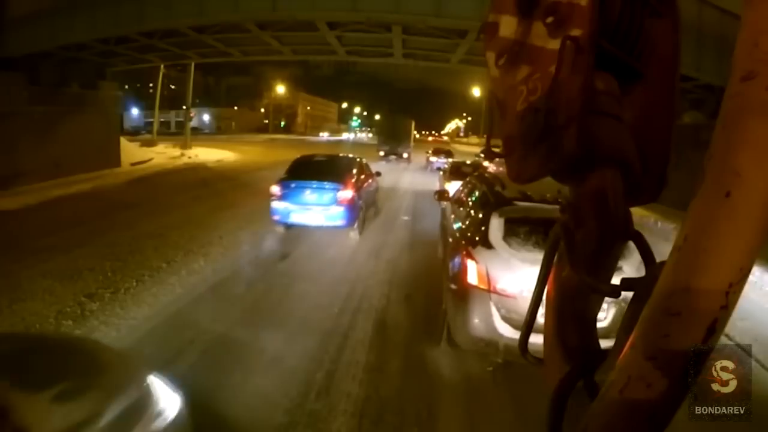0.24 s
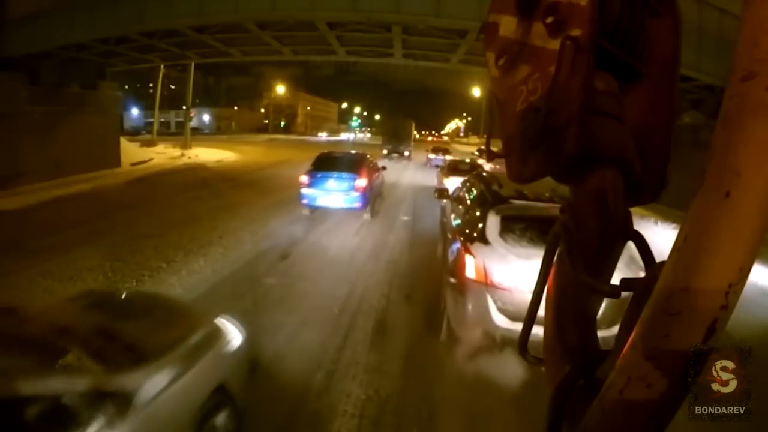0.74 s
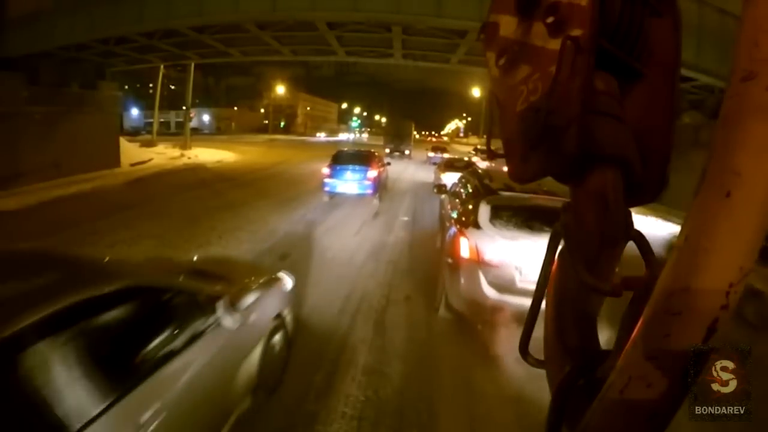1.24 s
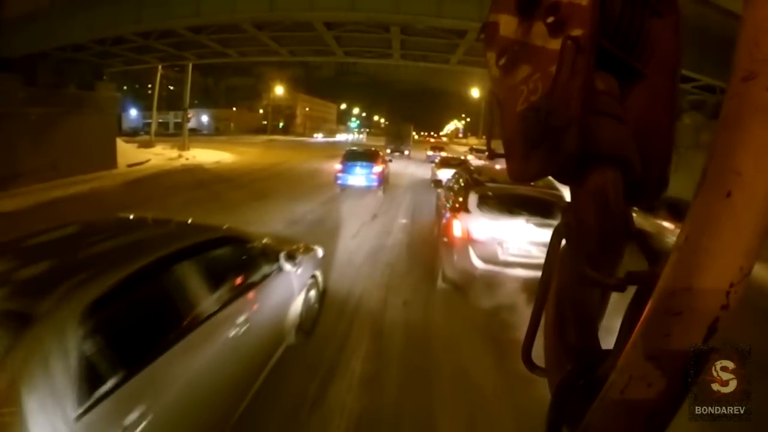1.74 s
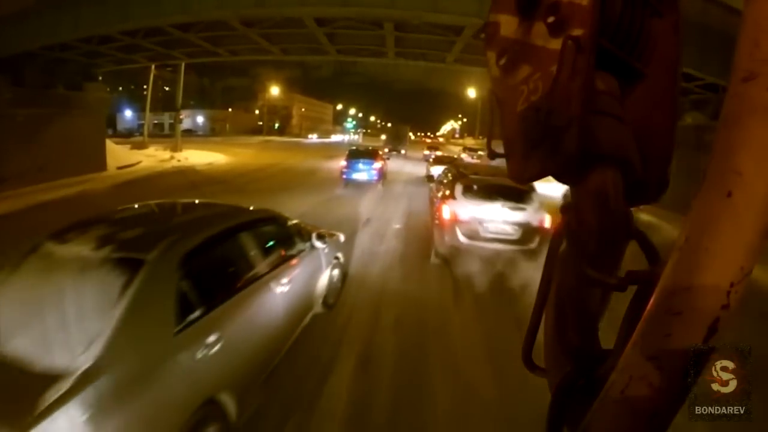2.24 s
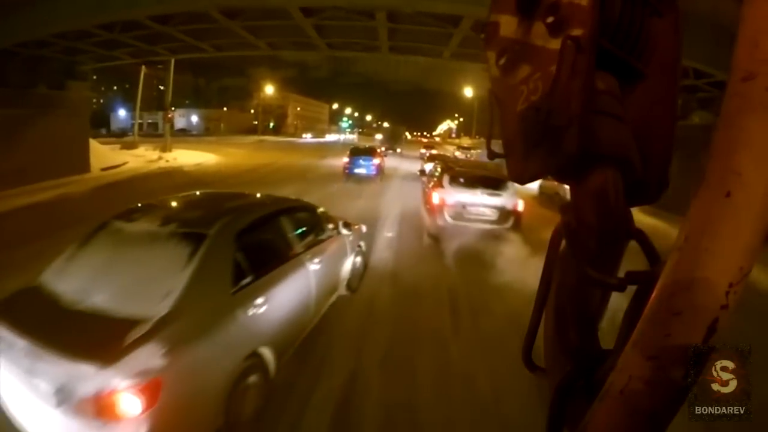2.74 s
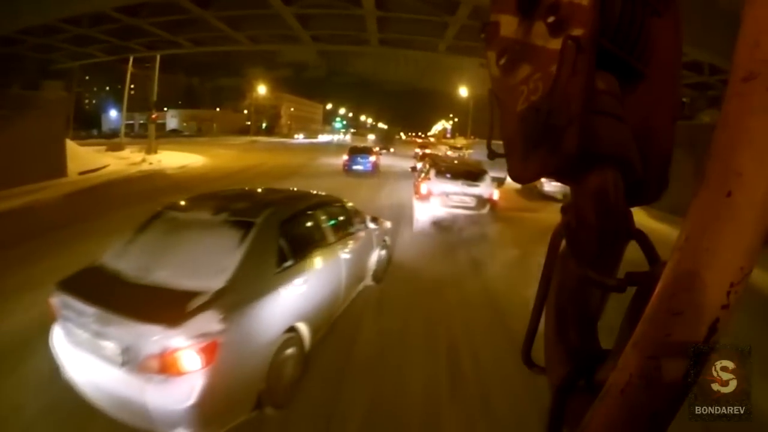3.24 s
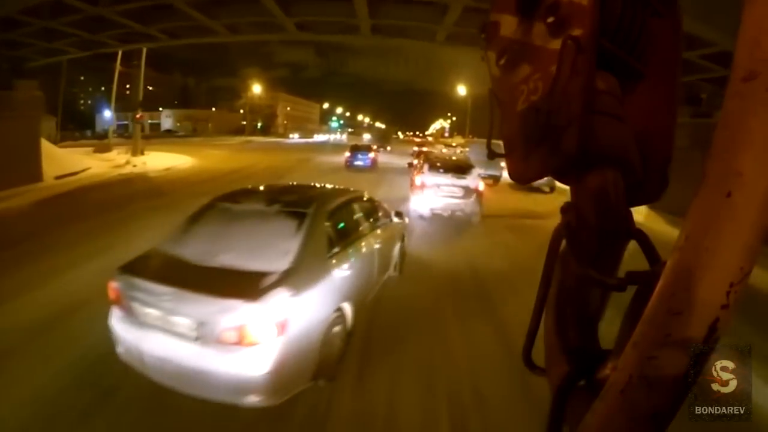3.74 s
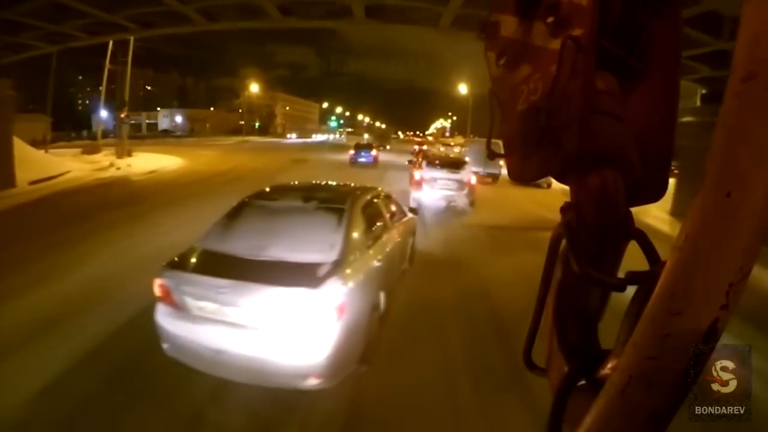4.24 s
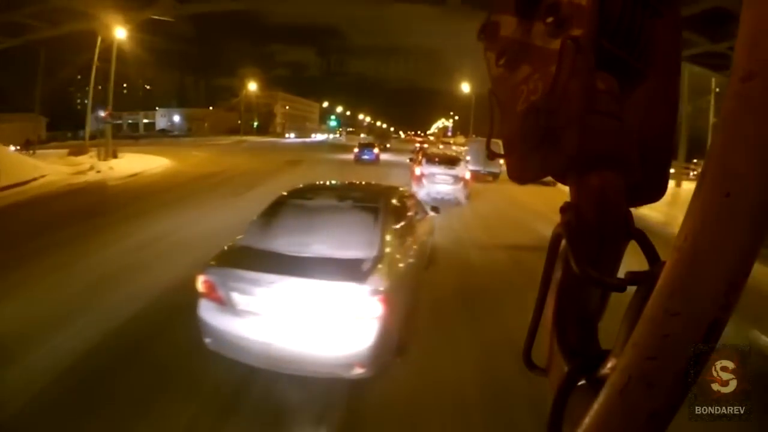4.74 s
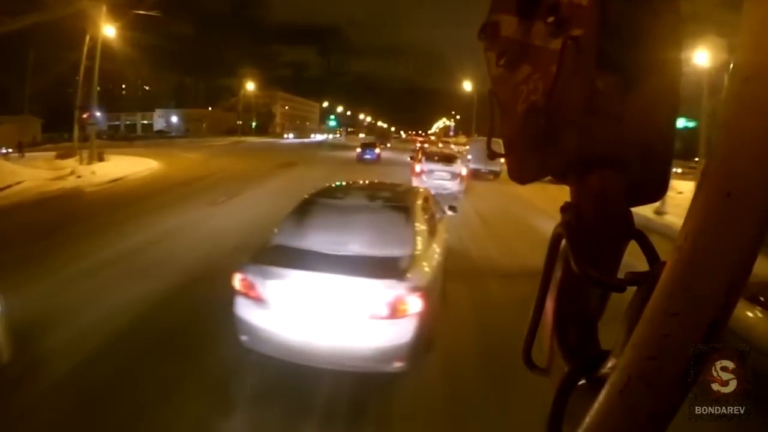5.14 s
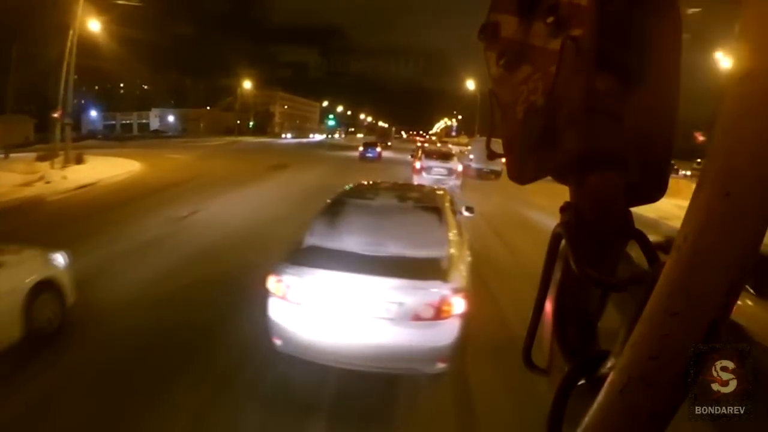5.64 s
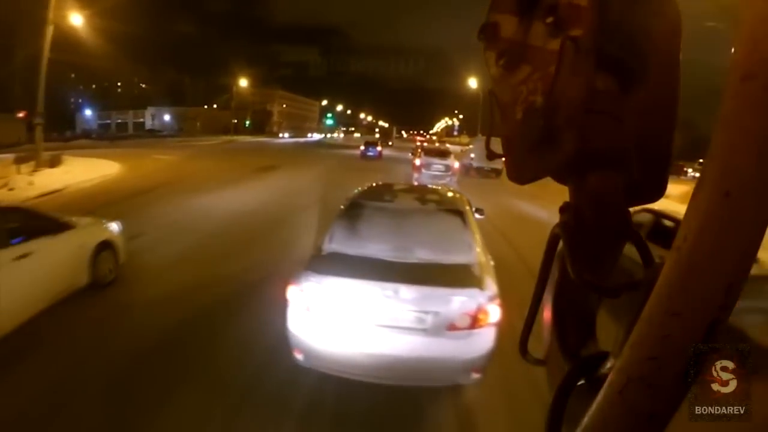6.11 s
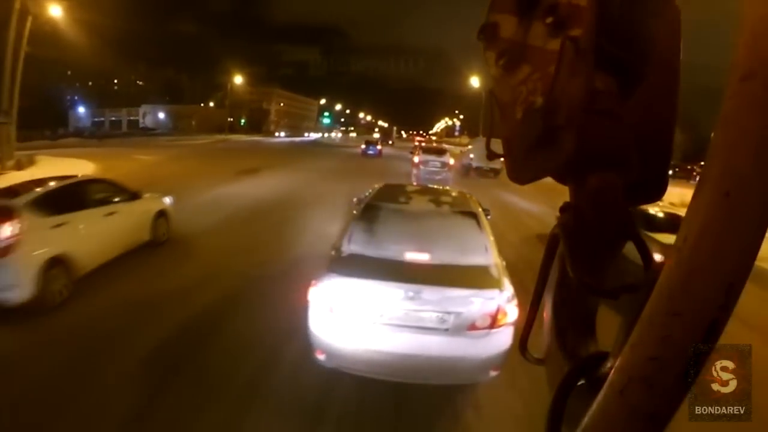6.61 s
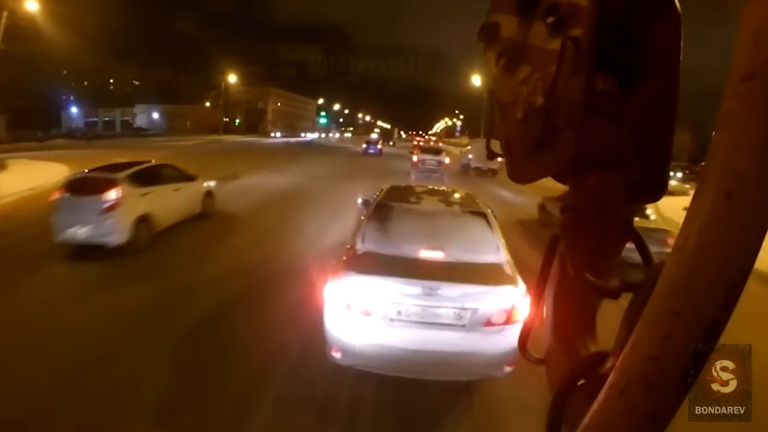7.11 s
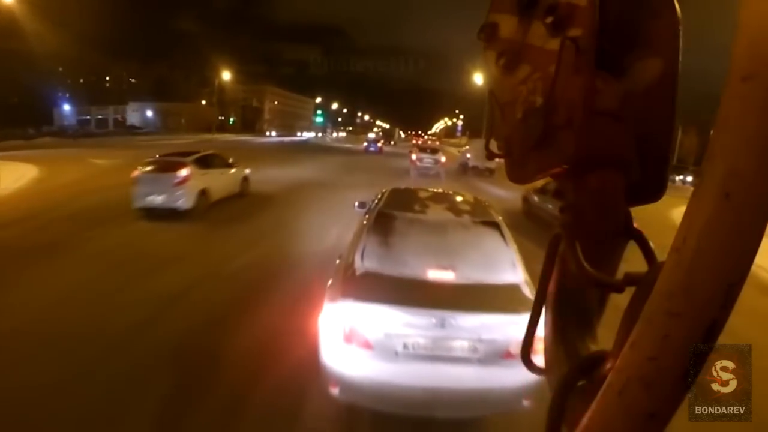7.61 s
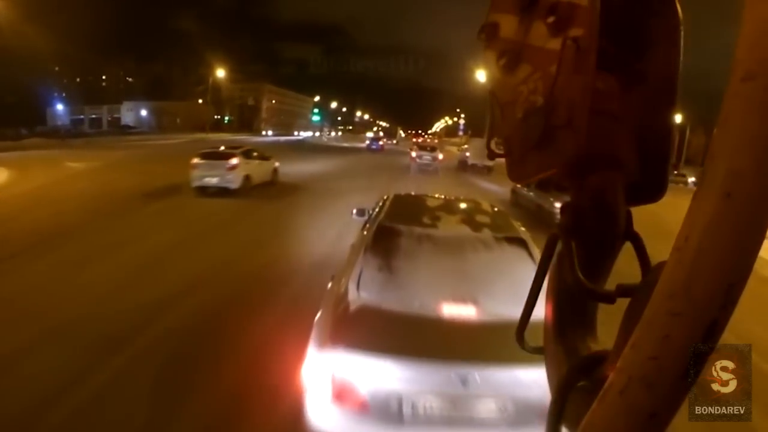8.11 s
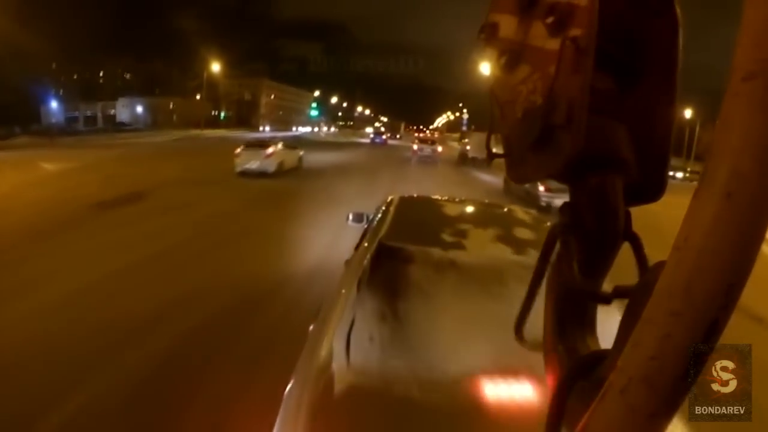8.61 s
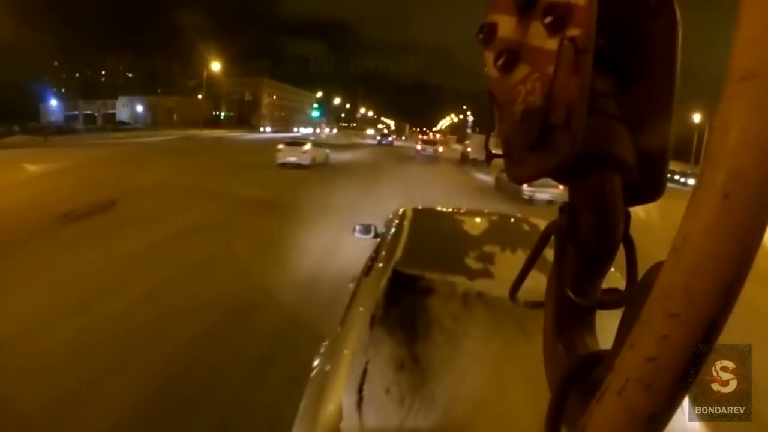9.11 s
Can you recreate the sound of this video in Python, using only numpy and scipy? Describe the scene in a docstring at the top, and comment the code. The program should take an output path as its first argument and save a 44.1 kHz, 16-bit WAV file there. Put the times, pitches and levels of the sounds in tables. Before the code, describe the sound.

Low cab rumble and rough diesel knocking swell as the truck pulls away, then sink back before a thudding bump and loose rattles.

```python
"""Diesel truck in slow traffic

Heard from the cab, a four-cylinder diesel revs up, pulls away and eases off.
Its firings are sine lines that drone and noise bursts that knock and clatter through resonant panels.
Low noise shakes the chassis and a wavering tone booms in the cab, over fan air and a thin whine.
A car hums past early on; near the end noise bursts make a heavy jolt and rattling fittings."""
import sys
import numpy as np
from scipy import signal
from scipy.fft import rfft, irfft
from scipy.io import wavfile

SR = 44100
rng = np.random.default_rng(int(sys.argv[2]) if len(sys.argv) > 2 else 0)


def output_pcm(signal):
    """Save a mono or channel-first signal as 16-bit PCM at the path in sys.argv[1].

    Samples are clipped to [-1, 1] before scaling.
    """
    pcm = np.clip(np.atleast_2d(signal).T, -1, 1) * 32767
    wavfile.write(sys.argv[1], SR, np.round(pcm).astype(np.int16))


N = 412776
TIME = np.arange(N) / SR  # seconds
FREQ = np.fft.rfftfreq(N, 1 / SR)  # Hz


def undb(db):
    """Turn decibels into a gain."""
    return 10 ** (np.asarray(db) / 20)


def unit(x):
    """Scale a signal to a standard level: rms 1."""
    return x / np.std(x)


def noise():
    """White noise: an independent random value at every sample."""
    return rng.standard_normal(N)


def tone(cycles):
    """A sine wave from its running count of cycles."""
    return np.sin(2 * np.pi * cycles)


def curves(table):
    """Join the points of each column of a timed table by straight lines."""
    seconds, *columns = np.transpose(table)
    return [np.interp(TIME, seconds, column) for column in columns]


def walk(rate):
    """Smooth random wandering of rms 1 that changes about rate times a second."""
    slow_part = np.exp(-(FREQ / rate) ** 2) * (FREQ > 0)
    return unit(irfft(rfft(noise()) * slow_part, N))


def colour(points):
    """Noise of rms 1 whose spectrum follows (Hz, dB) points and falls away above them."""
    hz, db = np.transpose(points)
    gain = undb(np.interp(np.log(FREQ + 1), np.log(hz), db))
    gain = gain / (1 + (FREQ / hz[-1] / 2) ** 4)
    return unit(irfft(rfft(noise()) * gain, N))


def ring(x, modes):
    """Let a signal excite steep-sided resonances, which ring only after they are struck; rms 1."""
    power = 0
    for hz, width, db in modes:
        detuning = (FREQ ** 2 - hz ** 2) / (width * (FREQ + 1))
        power = power + undb(db) ** 2 / (1 + detuning ** 2) ** 2
    # Keeping only the first half of the cepstrum makes the filter causal: no sound before the blow
    cepstrum = irfft(np.log(power + 1e-10), N)
    response = np.exp(rfft(cepstrum[:N // 2], N))
    return unit(irfft(rfft(x) * response, N))


def turns(hz):
    """Count the cycles since the start."""
    return np.cumsum(hz) / SR


def swells(rows, attack_s, release_s):
    """Add up gains that each rise, hold and die away, from rows of start, held time and dB."""
    total = 0
    for start, held, db in rows:
        rise = np.clip((TIME - start) / attack_s, 0, 1)
        fall = np.exp(-np.clip((TIME - start - held) / release_s, 0, 20))
        total = total + undb(db) * rise * fall
    return total


def blows(times, levels_db, decay_s, modes):
    """Short bursts of contact noise, quick to build and slower to die, set a group of modes ringing."""
    force = np.zeros(N)
    rise_s = .0015
    for seconds, db in zip(times, levels_db):
        start = int(seconds * SR)
        age = TIME[:N - start]
        rise = np.minimum(age / rise_s, 1)
        force[start:] += undb(db) * rise * np.exp(-np.minimum(age / decay_s, 20))
    force_rms = np.sqrt(np.mean(force ** 2))
    return force_rms * ring(force * noise(), modes)


def bursts(cycle, decay, scatter_db, steady):
    """Noise flares once a cycle with random strength and dies by decay (in cycles) to a steady floor."""
    strength = undb(scatter_db * rng.standard_normal(N // 100))[cycle.astype(int)]
    flare = strength * np.exp(-(cycle % 1) / decay)
    return noise() * (abs(steady) + flare)


# Hum of the passing car. Each row: start in seconds, held time in seconds, level in dB.
CAR_PASSES = [(1.35, 0.81, -27.5)]
CAR_HZ, CAR_SAG_HZ_PER_S = 55.5, 10.3


def passing_car(rough, attack_s, release_s):
    """A low exhaust hum with wavering strength sinks in pitch as a car draws past."""
    hz = CAR_HZ - CAR_SAG_HZ_PER_S * (TIME - CAR_PASSES[0][0])
    hum = (1 + rough * walk(12)) * tone(turns(hz))
    return swells(CAR_PASSES, attack_s, release_s) * hum


# Strength of the cylinders in firing order. One value for each: relative level in dB.
CYLINDER_STRENGTHS = [1, -9, 1.5, -10]


def firings(cycle, scatter_db):
    """Each firing gives a short push; the four cylinders differ, with some chance from push to push."""
    count = cycle.astype(int)
    strength_db = np.array(CYLINDER_STRENGTHS)[count % len(CYLINDER_STRENGTHS)]
    strength_db = strength_db + scatter_db * rng.standard_normal(count[-1] + 1)[count]
    push = np.exp(-((cycle % 1 - .5) / 0.028) ** 2)
    return unit(undb(strength_db) * push)


# Tone of the chassis shake. Each row: frequency in Hz, relative level in dB.
SHAKE_SPECTRUM = [(5, -17.5), (12, -11.5), (24, 5), (34, -7.5), (50, 7), (70, -8.5), (80, -17.5),
                  (92, -4.5), (110, -9.5), (160, -48.5)]
# How strongly the chassis shakes. Each row: time in seconds, level in dB before shake_db is added.
SHAKE_LEVELS = [(0.0, -35.5), (2.19, -44.5), (2.61, -34), (3.05, -40), (4.35, -34), (4.8, -29), (4.95, -37),
                (6.67, -42.5), (7.32, -33), (7.35, -28.5), (8.26, -45), (8.58, -26), (9.36, -35.5)]
# Road rumble in the panels, following the truck's pace.
# Each row: time in seconds, level in dB before rumble_db is added.
ROAD_LEVELS = [(0, -56), (.8, -56), (1.1, -50.5), (3.4, -49.5), (4, -46), (5.8, -39), (7, -45),
               (7.55, -45.5), (8.4, -54), (9.36, -56.5)]
# Low panel resonances, also used by the jolt. Each row: frequency in Hz, width in Hz, relative level in dB.
RUMBLE_RESONANCES = [(91.8, 19, 9), (147, 23.6, 2.5), (208.2, 28, 1.5), (262, 45.7, 6), (323, 67, -2.5),
                     (346, 25.4, -6), (447, 62, -12.5)]
# Booms of the cab over bumps in the road. Each row: start in seconds, held time in seconds, level in dB.
BUMP_BOOMS = [(.02, 0.074, -23.5), (.48, 0.11, -24), (.9, .1, -22.5), (1.52, .12, -25), (2.44, 0.18, -19.5),
              (2.72, 0.49, -21.5), (3.73, 0.33, -18), (4.4, .14, -23.5), (4.9, .07, -18),
              (5.04, 0.098, -18.5), (5.24, 0.34, -20.5), (5.72, 0.29, -19), (6.13, 0.32, -22.5),
              (6.58, .9, -20), (7.6, .28, -20.5), (8.47, .08, -17.5), (8.61, 0.15, -13)]
BOOM_HZ, BOOM_WANDER_HZ = 64.1, 2.08
BOOM_ATTACK_S, BOOM_RELEASE_S = 0.046, 0.051
# The weaker boom between bumps, growing steadily from start to end
SWAY_START_DB, SWAY_DB_PER_S, SWAY_SCATTER_DB = -36, 0.86, 5.5


def cab(cycle, shake_db, rumble_db, uneven_db):
    """Road and firings shake chassis and panels; the lowest cab resonance booms at bumps and sways between."""
    shake, = curves(SHAKE_LEVELS)
    rumble, = curves(ROAD_LEVELS)
    sway = undb(SWAY_START_DB + SWAY_DB_PER_S * TIME + SWAY_SCATTER_DB * np.tanh(walk(11)))
    boom = np.hypot(sway, swells(BUMP_BOOMS, BOOM_ATTACK_S, BOOM_RELEASE_S))
    boom_hz = BOOM_HZ + BOOM_WANDER_HZ * walk(14.7)
    swing = undb(uneven_db * np.tanh(walk(33))) * tone(turns(boom_hz))
    road_share = .6
    panels = road_share * ring(noise(), RUMBLE_RESONANCES)
    panels = panels + (1 - road_share) * ring(firings(cycle, scatter_db=4.0), RUMBLE_RESONANCES)
    chassis = undb(shake + shake_db) * colour(SHAKE_SPECTRUM)
    return boom * unit(swing) + chassis + undb(rumble + rumble_db) * unit(panels)


# Suspension thuds of the jolt. Each row: start in seconds, level in dB before thud_db is added.
SUSPENSION_THUDS = [(8.425, -37), (8.469, -29), (8.516, -25), (8.549, -26.5), (8.64, -29), (8.698, -35),
                    (8.785, -26.5), (8.831, -29.5)]
# Body resonances set off by the thuds. Each row: frequency in Hz, width in Hz, relative level in dB.
THUD_RESONANCES = [(124, 37, 4.5), (168, 49, 3), (260, 74, 2.5), (340, 71, -10.5)]
# The body's shudder through the jolt. Each row: start in seconds, held time in seconds, level in dB.
BODY_SHUDDER = [(8.45, 0.3, -37.5)]
# Panel resonances that knocks excite, also used by the rattles and the diesel.
# Each row: frequency in Hz, width in Hz, relative level in dB.
KNOCK_RESONANCES = [(529.2, 26.6, 1.8), (602, 64, -14.5), (734, 500, -31), (921, 71.3, -2.5),
                    (1071, 126, -15)]
# Clack of the mounts, also used by the rattles. Each row: frequency in Hz, width in Hz, relative level in dB.
MOUNT_RESONANCES = [(1380, 380, -4.5), (1730, 260, 5), (2250, 510, -5.5), (2560, 520, -3)]


def jolt(thud_db, decay_s, knock_db, chatter_db, settle_s):
    """The suspension takes a run of heavy blows; panels shudder and mounts chatter until it settles."""
    seconds, db = np.transpose(SUSPENSION_THUDS)
    thuds = blows(seconds, db + thud_db, decay_s, THUD_RESONANCES)
    panels = ring(noise(), RUMBLE_RESONANCES) + undb(knock_db) * ring(noise(), KNOCK_RESONANCES)
    uneven_noise = noise() * undb(4.6 * walk(60))
    chatter = undb(chatter_db) * ring(uneven_noise, MOUNT_RESONANCES)
    shudder = swells(BODY_SHUDDER, attack_s=0.027, release_s=settle_s)
    return thuds + shudder * (panels + chatter)


# Loose fittings. Each row: start in seconds, level in dB before each part's own setting is added,
# brightness in dB (added to the high ring, taken from the panel knock).
FITTING_RATTLES = [(2.731, -46, 6), (3.441, -43, -7), (4.635, -35.5, -3), (7.519, -39.5, -3.5),
                   (7.842, -42, -2), (7.964, -46, 4), (8.469, -40, -3), (8.51, -40.5, 2.5),
                   (8.565, -31, -2), (8.578, -41.5, 1), (8.616, -52, 1.5), (8.655, -35.5, 2),
                   (8.717, -35, -1.5), (8.787, -37.5, -2.5), (8.89, -42.5, -3.5), (8.969, -51, 13.5),
                   (8.995, -39, 1), (9.019, -44, -1.5), (9.092, -40.5, 1), (9.181, -47.5, 1.5),
                   (9.214, -46, -8.5), (9.333, -42.5, -6.5)]
# Ring of the fittings themselves. Each row: frequency in Hz, width in Hz, relative level in dB.
FITTING_RESONANCES = [(3650, 1300, 9), (4550, 1400, 0), (5713, 1300, 10.5), (6050, 860, 0),
                      (7800, 1300, -4), (10500, 6500, -17.5)]


def rattles(ring_db, clack_db, knock_db, ring_s, clack_s, knock_s):
    """Each loose fitting chatters briefly: it rings high, clacks on its mount and knocks the panels."""
    seconds, db, bright = np.transpose(FITTING_RATTLES)
    fitting = blows(seconds, db + bright + ring_db, ring_s, FITTING_RESONANCES)
    mount = blows(seconds, db + clack_db, clack_s, MOUNT_RESONANCES)
    panels = blows(seconds, db - bright + knock_db, knock_s, KNOCK_RESONANCES)
    return fitting + mount + panels


# Tone of the fan and intake air. Each row: frequency in Hz, relative level in dB.
AIR_SPECTRUM = [(300, -2), (700, -0.5), (1200, -1), (2200, 1), (3200, -11), (5000, -10.5), (6200, -9.5),
                (7100, -18.5), (7900, -20), (9000, -22), (12000, -31), (15000, -35.5)]
# Lines of the whine. Each row: multiple of its base pitch, relative level in dB,
# pitch flutter as a share of the pitch.
WHINE_PARTS = [(0.999, -6, 0.0071), (5.72, -10, 0.025), (7, -18.5, 0.0083)]
# Base pitch and level at the top of the arch, and how they fall with time squared
WHINE_TOP_S, WHINE_HZ, WHINE_SAG_HZ_PER_S2 = 5.71, 1127, 300
WHINE_DB, WHINE_FADE_DB_PER_S2 = -41.5, 20


def accessories(clatter_db, air_db, air_growth):
    """Fan and intake air swells with the clatter; a thin, unsteady whine arches over the highest revs."""
    air = undb(air_db + air_growth * (clatter_db - clatter_db.max())) * colour(AIR_SPECTRUM)
    arch = np.minimum((TIME - WHINE_TOP_S) ** 2, 2)  # seconds squared, held at 2 farther out
    hz = WHINE_HZ - WHINE_SAG_HZ_PER_S2 * arch
    whine = np.zeros(N)
    for multiple, line_db, flutter in WHINE_PARTS:
        spin = turns(multiple * hz * (1 + flutter * walk(120)))
        whine += undb(line_db + 5.4 * np.tanh(walk(25))) * tone(spin)
    return air + undb(WHINE_DB - WHINE_FADE_DB_PER_S2 * arch) * whine


# How knock and clatter grow with the revs. Each holds: coasting level in dB at idle, its growth in dB
# per octave of revs, added load level in dB at idle, its growth in dB per octave.
KNOCK_GROWTH = (-56.5, 20, -44.5, 2.5)
CLATTER_GROWTH = (-51, 17, -45.5, 8)
IDLE_HZ = 37  # firing rate taken as idle


def effort(law, firing_hz, pedal):
    """Level in dB of a coasting part and a part under load, each growing with the revs."""
    coast_db, coast_slope, load_db, load_slope = law
    octaves = np.log2(firing_hz / IDLE_HZ)
    coast = undb(coast_db + coast_slope * octaves)
    load = pedal * undb(load_db + load_slope * octaves)
    return 20 * np.log10(np.hypot(coast, load))


# Higher panel resonances that ticks excite. Each row: frequency in Hz, width in Hz, relative level in dB.
CLATTER_RESONANCES = [(1278, 100, -10.5), (1419, 113, -4), (1589, 200, -6), (1733, 163, 1.5),
                      (1860, 140, -9), (2110, 270, -17.5), (2483, 158, -6), (2660, 440, -11),
                      (3536, 250, -16.5), (3850, 220, -18.5), (4404, 400, -19.5), (4970, 610, -30.5),
                      (5630, 460, -18), (6220, 630, -23.5), (7620, 810, -28), (11500, 7800, -48)]


def diesel(cycle, knock_db, clatter_db):
    """Combustion knocks the large panels; valves and injectors tick twice as often into higher modes."""
    panels = ring(bursts(cycle, decay=0.38, scatter_db=3.0, steady=0.64), KNOCK_RESONANCES)
    ticks = bursts(2 * cycle, decay=0.89, scatter_db=1.5, steady=1.0) * undb(1.07 * walk(45))
    return undb(knock_db) * panels + undb(clatter_db) * ring(ticks, CLATTER_RESONANCES)


def resonance(peak, firing_hz):
    """Gain as the revs sweep through a resonance."""
    hz, width, db, slope = peak
    growth = undb(db + slope * np.log2(firing_hz / hz))
    return growth / np.hypot(1, 2 * (firing_hz - hz) / width)


# Lines of the exhaust throb. Each row: multiple of the firing rate, relative level in dB.
THROB_LINES = [(0.499, -14), (.75, -9.5), (1, -1), (1.251, -15), (1.5, -10), (1.75, -15), (2.002, -25.5),
               (2.251, -18)]
# Exhaust resonances met as the revs climb. Each holds: firing rate in Hz, width in Hz,
# gain at the peak in dB, growth in dB per octave of revs.
DRONE_RESONANCE = (64, 4, -22, 22)
THROB_RESONANCE = (60, 6.5, -23.5, 3.5)
THROB_COASTING = 0.65  # share of the throb left with the pedal up


def exhaust(cycle, firing_hz, pedal, rough):
    """Unequal cylinders throb near quarters of the firing rate; its fourth multiple drones at high revs."""
    throb = resonance(THROB_RESONANCE, firing_hz) * (THROB_COASTING + (1 - THROB_COASTING) * pedal)
    lines = 0
    for order, db in THROB_LINES:
        strength = undb(db) * (1 + rough * walk(18))
        lines = lines + strength * tone(order * cycle + rng.random())
    wavering_phase = 2 * np.pi * 4 * cycle + 0.06 * walk(28)
    note = (1 + 0.26 * walk(15)) * np.sin(wavering_phase)
    return throb * lines + resonance(DRONE_RESONANCE, firing_hz) * note


# Engine speed, before its small wandering. Each row: time in seconds, firing rate in Hz.
ENGINE_SPEED = [(0, 36.94), (.85, 35.92), (1.2, 38.8), (2.6, 38.15), (3.2, 39.03), (3.7, 41.17),
                (4.1, 46.42), (5, 56.5), (5.45, 64.07), (5.97, 66.93), (6.2, 61.97), (6.75, 52.8),
                (7.2, 46.5), (7.6, 43.32), (9.36, 36.92)]
# How far the accelerator is held down, in stretches; from .84 to 6 s they overlap as one long press.
# Each row: start in seconds, held time in seconds, strength in dB.
PEDAL_STRETCHES = [(0, 0.3, -7.5), (.26, .24, -1), (.84, 1.21, 0), (2.05, 1.216, -1.5), (3.25, 2.73, 1),
                   (7.2, .31, 2)]
PEDAL_ATTACK_S, PEDAL_RELEASE_S = 0.12, .055
HUNT_SHARE = .014  # how far the revs wander at idle; they steady as they climb


def scene():
    """Add the engine, cab and fittings together, with a car going by outside."""
    firing_hz, = curves(ENGINE_SPEED)
    pedal = swells(PEDAL_STRETCHES, PEDAL_ATTACK_S, PEDAL_RELEASE_S)
    knock_db = effort(KNOCK_GROWTH, firing_hz, pedal)
    clatter_db = effort(CLATTER_GROWTH, firing_hz, pedal)
    hunting = HUNT_SHARE * (IDLE_HZ / firing_hz) ** 4 * walk(3)
    cycle = turns(firing_hz * (1 + hunting + .003 * walk(9.3)))  # firings counted so far
    car = passing_car(rough=.23, attack_s=.5, release_s=0.13)
    body = cab(cycle, shake_db=5.5, rumble_db=10.0, uneven_db=0.55)
    body = body + jolt(thud_db=2.5, decay_s=0.013, knock_db=-14, chatter_db=-14.5, settle_s=0.37)
    loose = rattles(ring_db=-6, clack_db=-3.5, knock_db=-7.5, ring_s=0.013, clack_s=0.026, knock_s=0.029)
    engine = accessories(clatter_db, air_db=-42, air_growth=1.09)
    engine = engine + diesel(cycle, knock_db, clatter_db)
    engine = engine + exhaust(cycle, firing_hz, pedal, rough=0.23)
    return (car + body + loose + engine)[None]


TOP_HZ = 15300


def record(dry):
    """Open softly, round the loudest peaks and cut the treble above TOP_HZ."""
    dry = dry * np.minimum(TIME / .003, 1)
    ceiling = 0.42
    rounded = dry / (1 + (dry / ceiling) ** 4) ** (1 / 4)
    low_pass = signal.ellip(8, .2, 70, TOP_HZ, fs=SR, output="sos")
    return signal.sosfilt(low_pass, rounded)


dry = scene()
out = record(dry)
output_pcm(out)
```